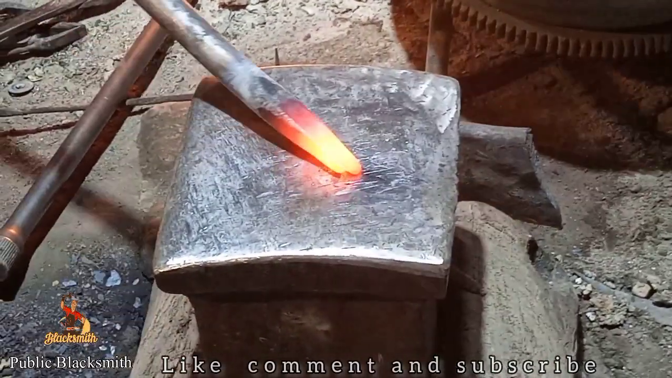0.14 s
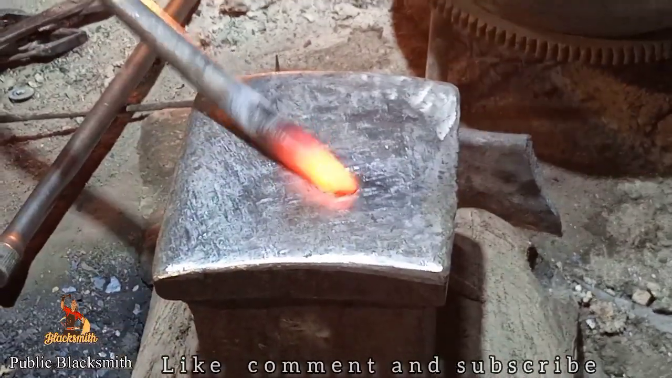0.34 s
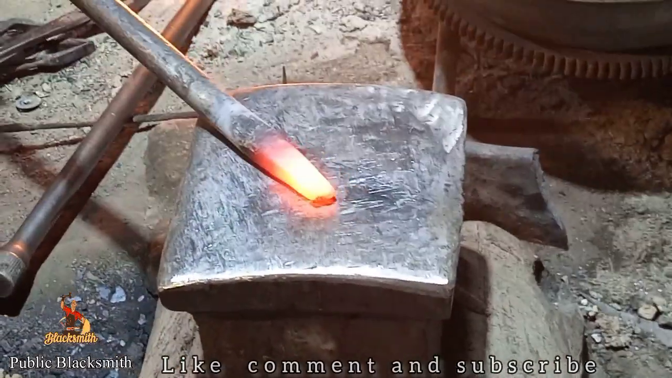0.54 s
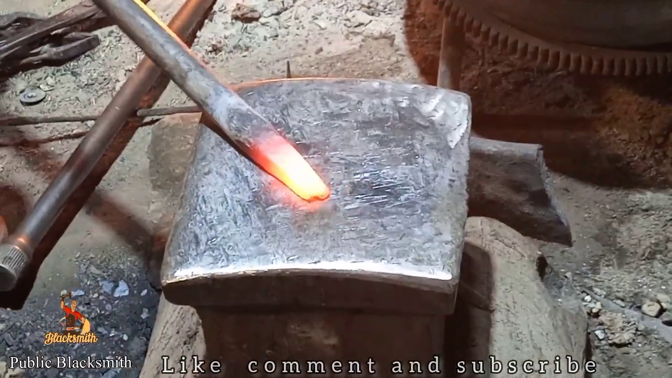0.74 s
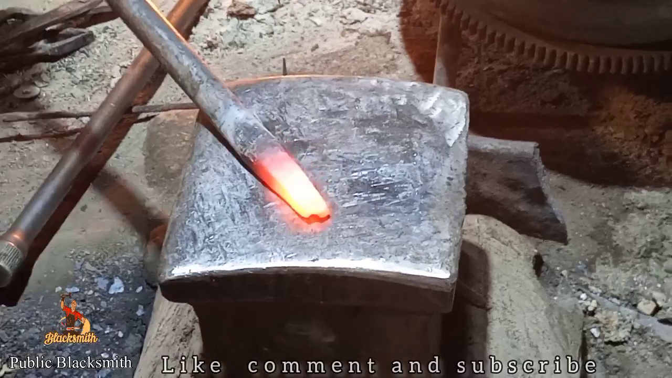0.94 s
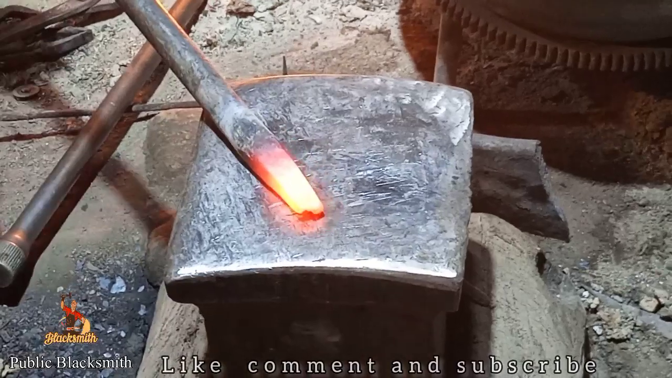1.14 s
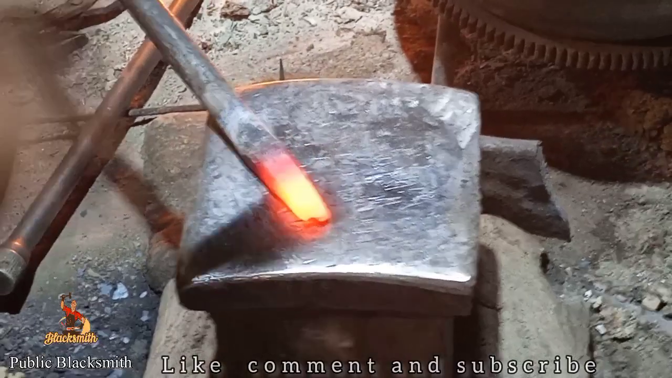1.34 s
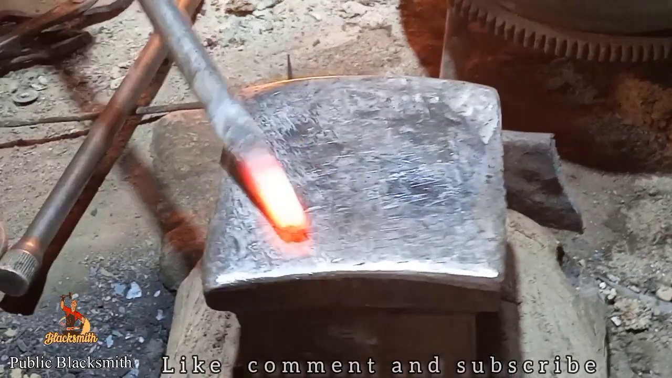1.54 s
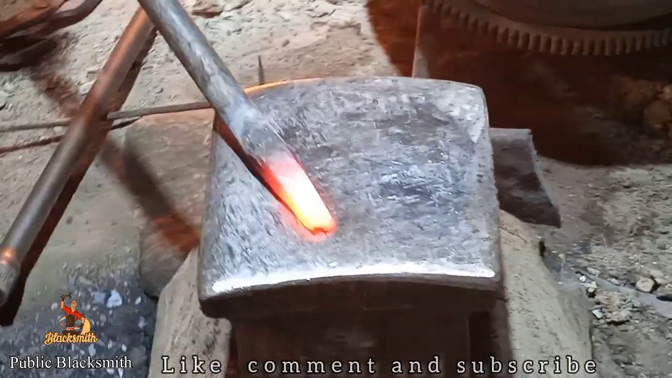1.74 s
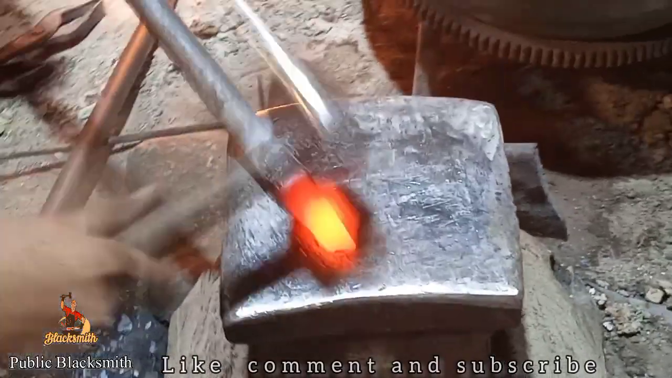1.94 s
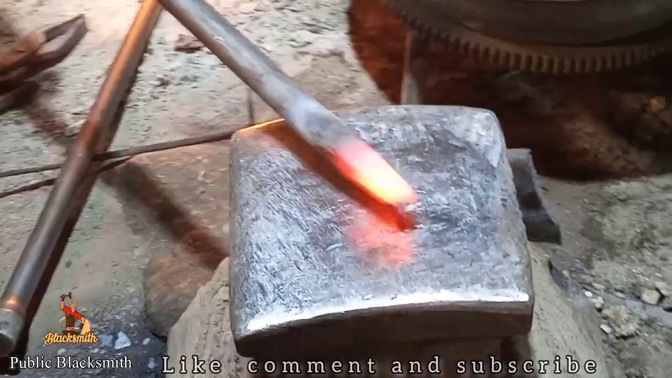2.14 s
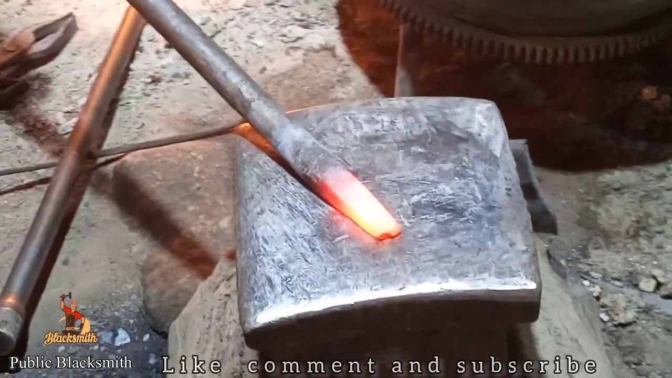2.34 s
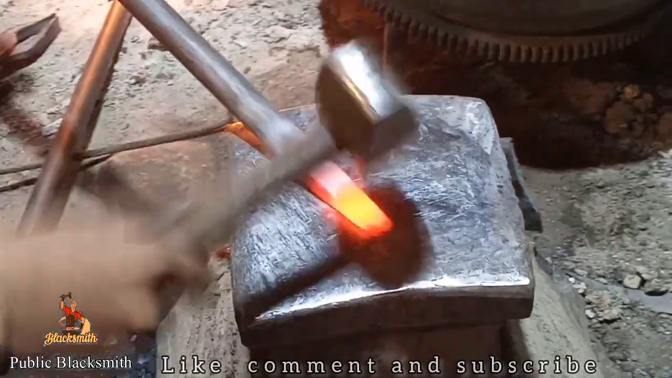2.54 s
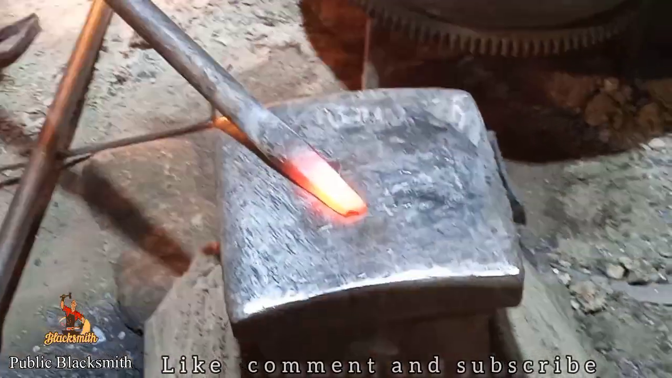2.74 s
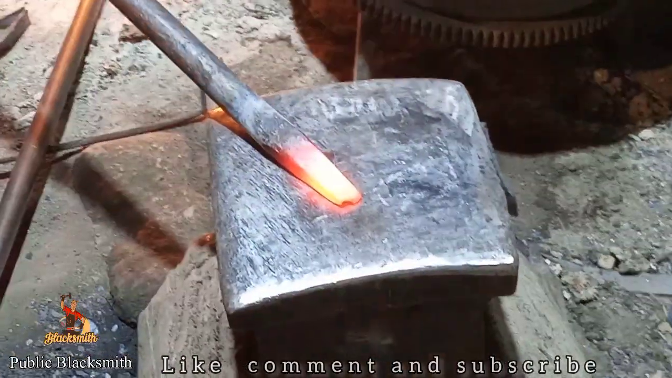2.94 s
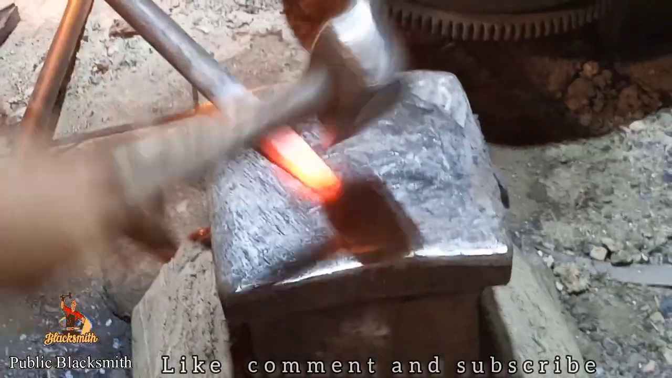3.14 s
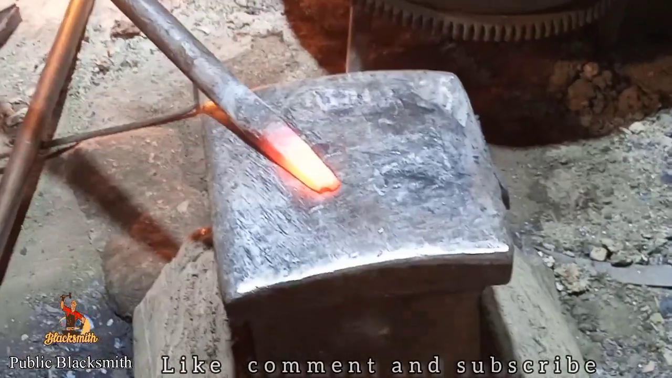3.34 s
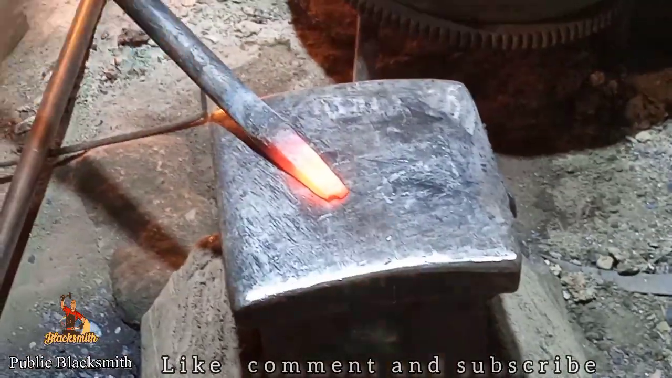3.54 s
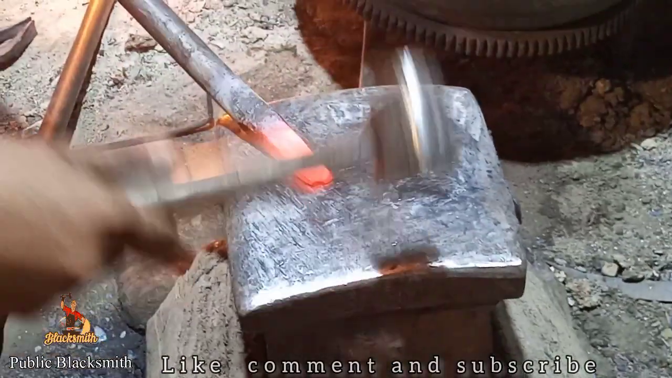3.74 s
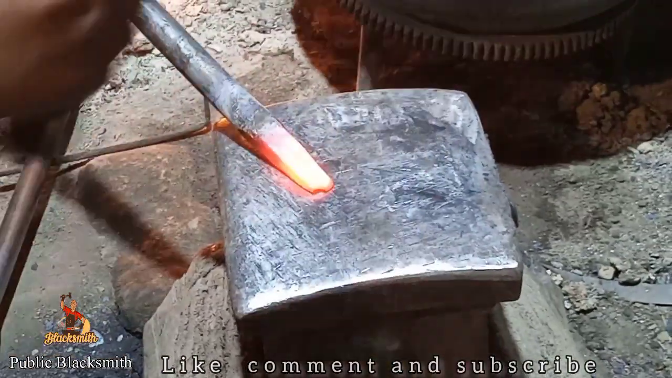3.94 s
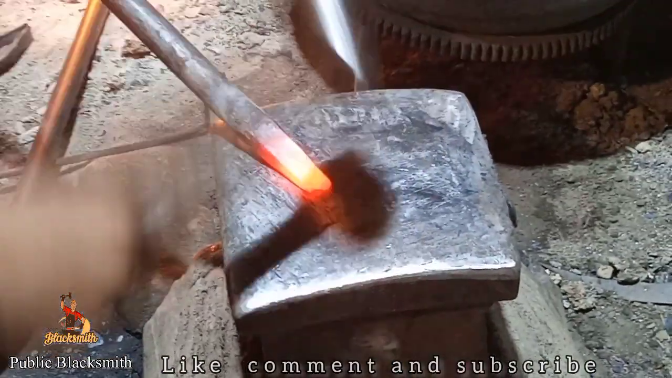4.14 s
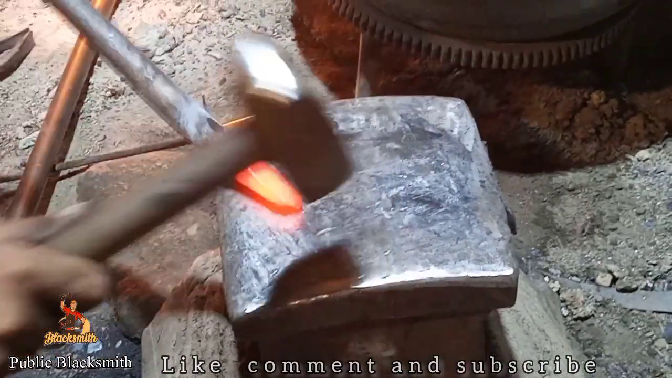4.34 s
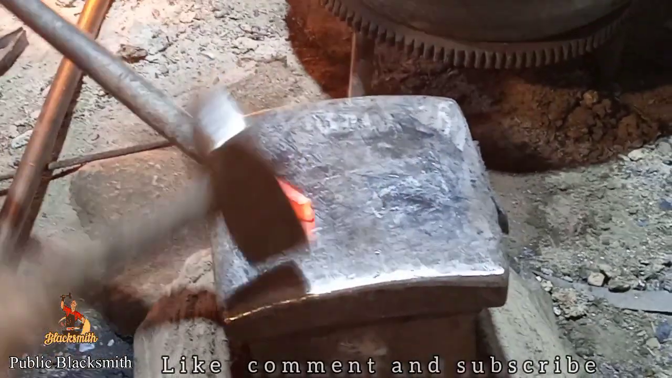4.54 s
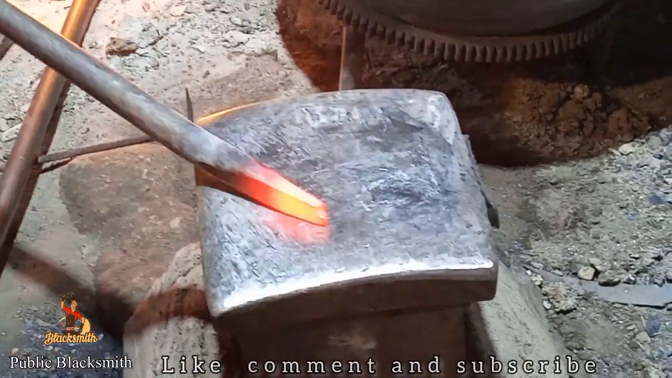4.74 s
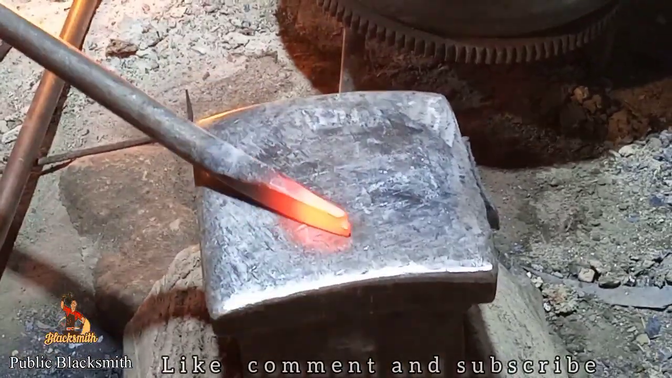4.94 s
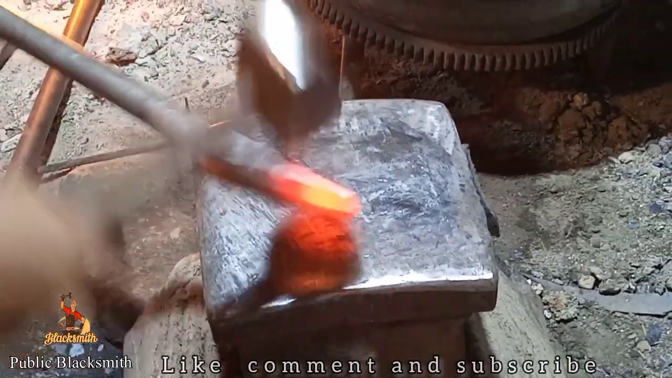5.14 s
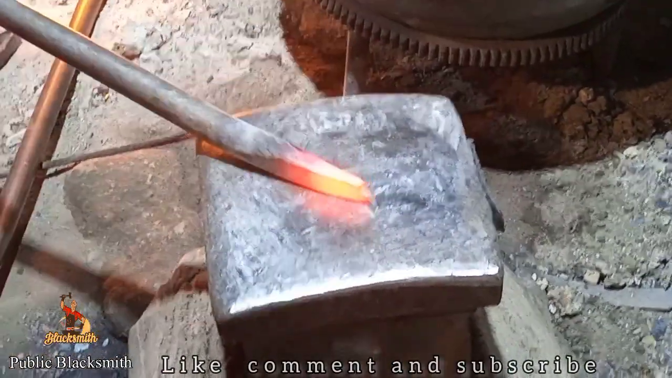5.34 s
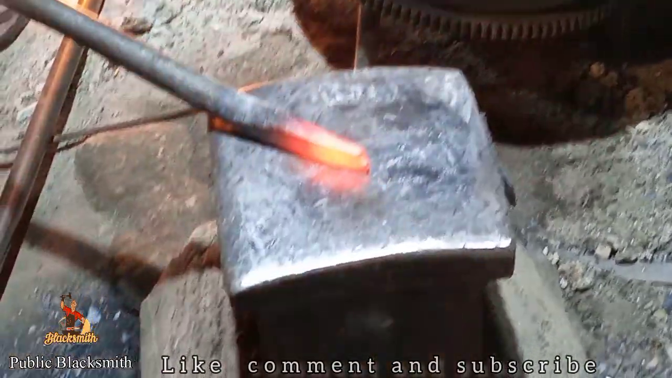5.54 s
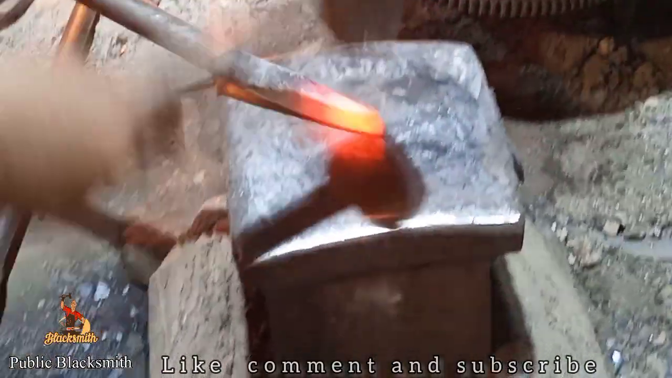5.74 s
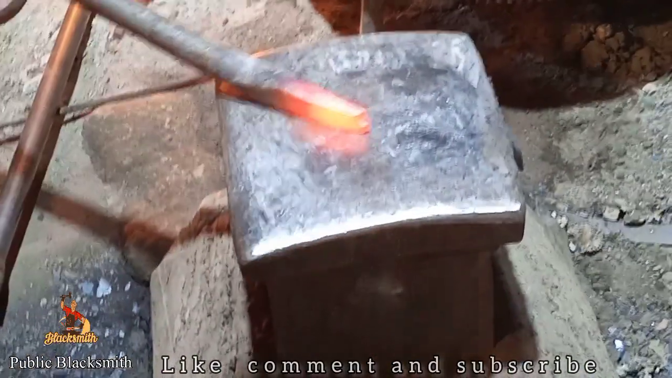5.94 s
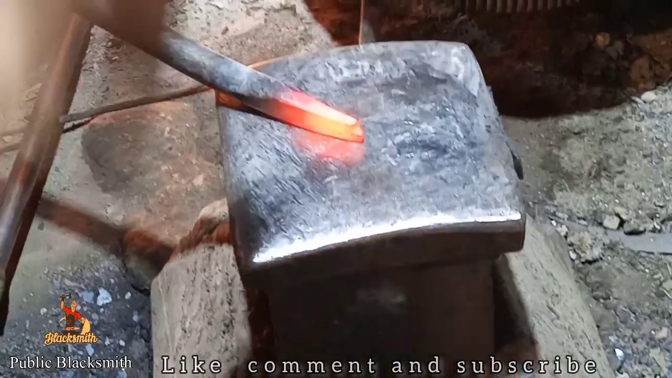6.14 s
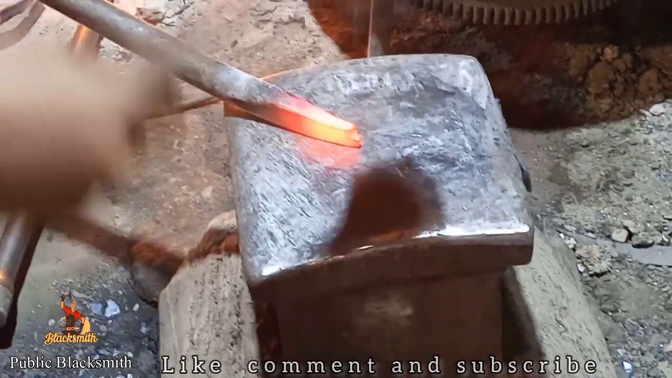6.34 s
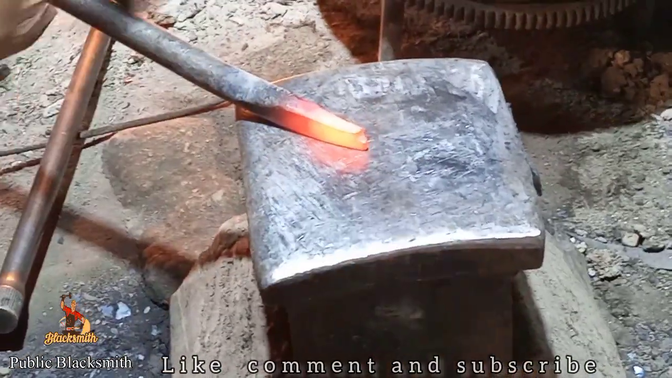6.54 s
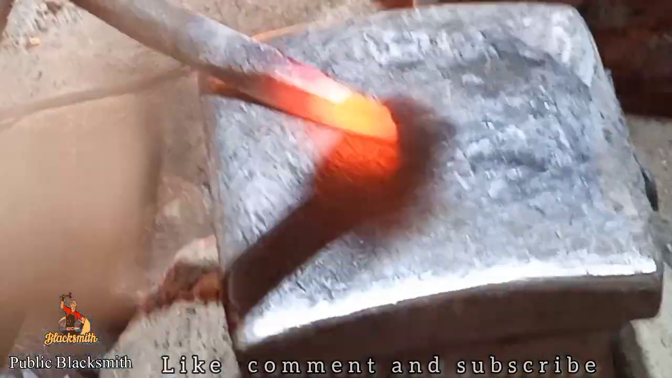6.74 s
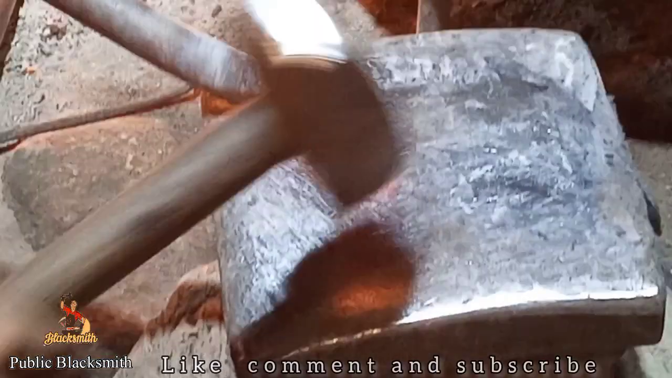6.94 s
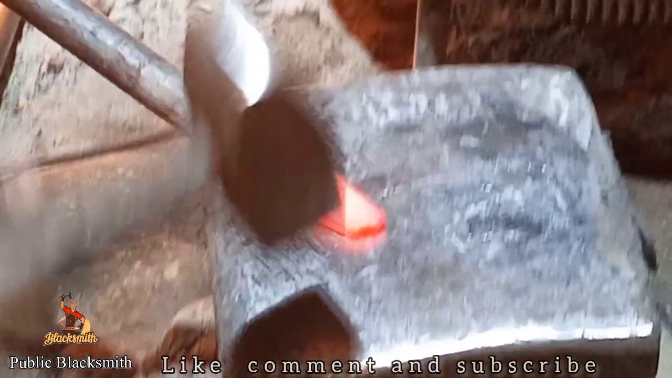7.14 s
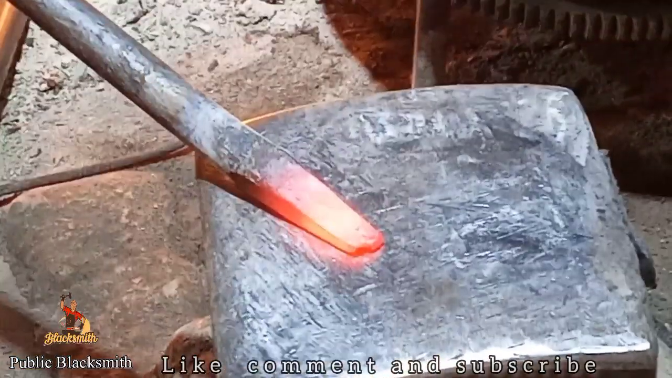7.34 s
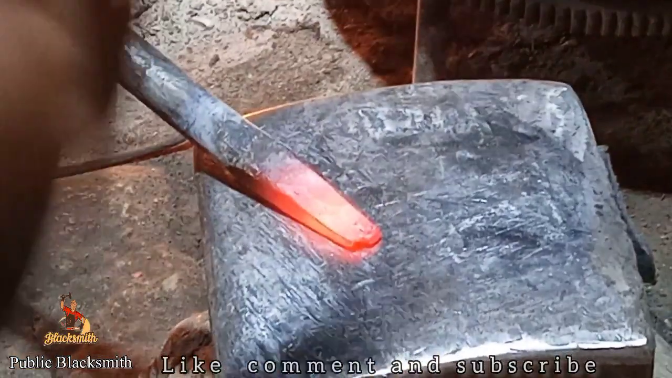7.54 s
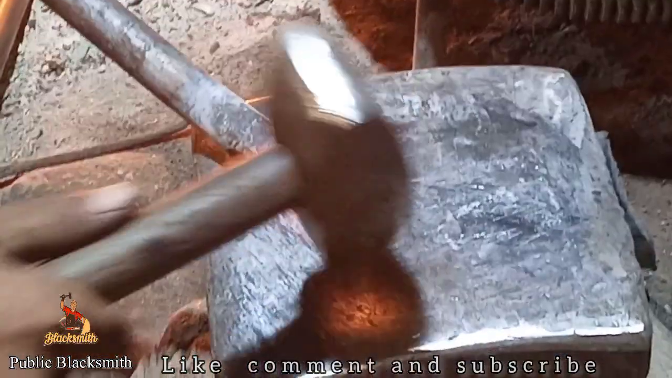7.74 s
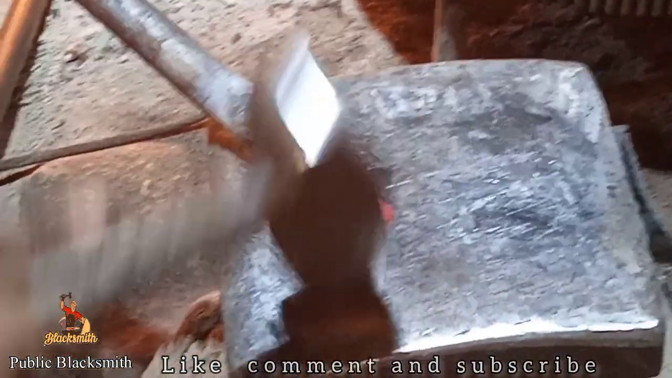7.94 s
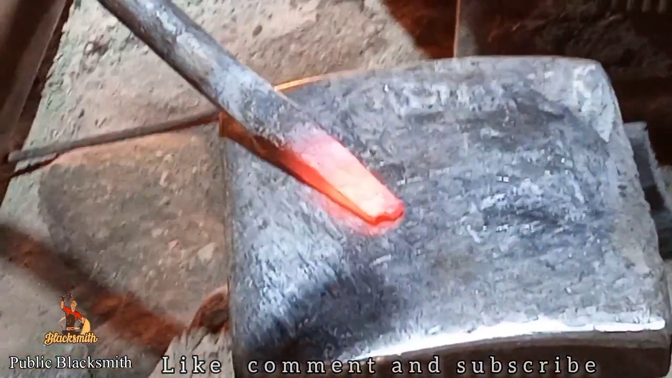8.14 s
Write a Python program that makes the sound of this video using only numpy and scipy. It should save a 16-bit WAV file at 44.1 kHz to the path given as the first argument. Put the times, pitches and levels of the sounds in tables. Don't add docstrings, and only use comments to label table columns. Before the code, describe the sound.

Blunt metallic hammer blows about twice a second, each with a short clattering ring and rough wash, in an open forge with rushing air.

```python
import sys
import numpy as np
from scipy import signal
from scipy.fft import rfft, irfft, next_fast_len
from scipy.io import wavfile
from scipy.ndimage import uniform_filter1d

SR = 44100
rng = np.random.default_rng(int(sys.argv[2]) if len(sys.argv) > 2 else 0)


def log_audio(samples):
    frames = np.atleast_2d(samples).T
    limited = np.clip(frames, -1, 1)
    pcm = np.round(limited * 32767).astype(np.int16)
    wavfile.write(sys.argv[1], SR, pcm)


def invert_db(x):
    u = np.asarray(x, float) / 20
    return 10 ** u


N = 361179

# start in seconds, crack in dB, force in dB, anvil ring in dB.
BLOWS = [(1.449, -8, -1.5, -39), (2.0225, 5, -5, -27), (2.596, 5.5, -7, -28), (3.164, 2.5, -5.5, -33),
         (3.7286, 1, -8.5, -26), (4.255, 6, -5, -36), (4.5908, -0.5, -18, -64), (5.1946, 7.5, -2.5, -22),
         (5.7529, 3.5, -5, -48), (6.3212, 0.5, -8.5, -33), (6.8785, 0.5, -4.5, -31),
         (7.1568, -0.5, -20, -62), (7.7231, -7, -10.5, -64), (8.0059, -2, -18.5, -69)]
# start in seconds, up-and-down bending in dB, sideways bending in dB,
# place along the bar (0 to about 0.5), tilt in dB per octave.
STRUCK = [(1.449, -4, -6, 0.26, 2), (2.0219, 3, -17, 0.26, 4.5), (2.5963, -14, -34, 0.25, 7),
          (3.16, -10, -20, 0.011, 0.5), (3.7287, -15.5, -24, 0.1, 5.5), (4.256, -7.5, -10.5, 0.0056, -1),
          (4.5901, -39, -43, 0.25, 1.5), (5.1956, -4, 4.5, 0.15, 0), (5.7527, -10, -8, 0.48, -7),
          (6.3218, -15, -13.5, 0.557, 2), (6.8776, -19, -8, 0.35, 1), (7.1572, -45, -32, 0.28, -2),
          (7.7236, -7.5, -19.5, 0.427, -2), (8.0059, -46.5, -35, 0.27, 15)]
# frequency in Hz, level in dB per Hz.
BLOWER = [(24, -62), (40, -23), (64, -16), (103, -6.5), (153, -9.5), (321, 0), (514, -9), (568, -7),
          (1110, -13.5), (1730, 1), (1960, -20.5), (2450, 2.5), (3070, -24), (3740, -14), (15000, -103)]


def rms_one(x):
    return x / np.sqrt(np.mean(x ** 2) + 1e-20)


def at_hz(points, hz):
    table_hz, values = np.transpose(points)
    return np.interp(np.log(hz), np.log(table_hz), values)


def clicks(times, levels_db):
    out = np.full(N, 1e-18)
    out[(np.asarray(times) * SR).astype(int)] = invert_db(levels_db)
    return out


def ring(x, hz, t60):
    r, w = invert_db(-60 / (t60 * SR)), 2 * np.pi * hz / SR
    return signal.lfilter([0, np.sin(w)], [1, -2 * r * np.cos(w), r * r], x)


def fade(x, t60):
    return signal.lfilter([1], [1, -invert_db(-60 / (t60 * SR))], x)


def bands():
    edges = 40 * 2 ** np.arange(0, 8.8, 1 / 3)
    white = rng.standard_normal((2, N))
    for k, (low, high) in enumerate(zip(edges, edges[1:])):
        band_filter = signal.butter(2, [low, high], "band", fs=SR, output="sos")
        yield np.sqrt(low * high), signal.sosfilt(band_filter, white[k % 2])


def drift(rate):
    knots = rng.standard_normal(400)
    return np.interp(np.arange(N) / SR * rate, np.arange(400), knots)


def background_air(hz, band, patchy_db=0.5):
    return band * invert_db(at_hz(BLOWER, hz) + patchy_db * drift(23)) / (1 + (hz / 8200) ** 6)


def blower(level_db=-57.5):
    # frequency in Hz, width in Hz, level in dB.
    duct_tones = [(568.4, 13.6, -69.5), (1722, 124, -59.5), (3673, 78, -74), (5910, 1100, -80.5),
                  (154, 9.2, -67.5), (75.5, 7, -73)]
    hiss = sum(background_air(hz, band) for hz, band in bands() if hz > 210)
    out = invert_db(level_db) * rms_one(hiss)
    for hz, width_hz, db in duct_tones:
        out += invert_db(db) * rms_one(ring(rng.standard_normal(N), hz, 3.0 / width_hz))
    return out


def rumble(lumps_db=7, shake_db=-37.5, shake_t60_s=0.36):
    # time in seconds, rumble in dB.
    gusts = [(0.0, -55.5), (0.84, -62.5), (1.71, -62), (2.76, -78.5), (3.78, -55), (3.94, -63),
             (5.57, -66.5), (6.52, -59), (6.89, -65), (8.19, -56)]
    times, _, force_db, _ = np.transpose(BLOWS)
    shake = fade(clicks(times, force_db + shake_db), shake_t60_s)
    gain = invert_db(np.interp(np.arange(N) / SR, *np.transpose(gusts))) + shake
    low = sum(background_air(hz, band) * invert_db(lumps_db * drift(6)) for hz, band in bands() if hz <= 210)
    return gain * rms_one(low)


def hammer(contact_s=0.0014, head_swell_s=0.024):
    # frequency in Hz, level in dB, t60 in seconds.
    crack = [(920, -6, 0.0055), (1925, 14, 0.001), (2410, -15, 0.0089), (6200, -31, .01),
             (10300, -49, 0.028), (15100, -47, 0.035)]
    thud = [(210, -17, 0.12), (620, -1, 0.018)]
    anvil = [(2444, -9, .2), (3205, 4, .3), (4490, -10, .18), (6368, -12, .22), (13155, -29, .35)]
    head = [(11236, 6, .55)]
    head_side = [(2260, -1, .12), (2550, 0, .1), (2720, 7, .16), (2990, 1.5, .1), (7600, -20, .15),
                 (9250, -17, .24), (10650, -29, .12)]
    # long ring in dB, side ring in dB.
    head_rings = [(-47, -31), (-64, -41), (-59, -34), (-57.5, -24), (-55, -49), (-83, -19), (-86, -37),
                  (-41, -23), (-52.5, -42), (-51, -50), (-73, -48), (-94, -25.5), (-54.5, -55),
                  (-83, -36.5)]
    # time in seconds, level in dB.
    head_before = (0.0, -68.5)
    times, *levels_db = np.transpose(BLOWS)
    levels_db += list(np.transpose(head_rings))
    rings = ring(clicks([head_before[0]], head_before[1]), head[0][0], head[0][2])
    for modes, level_db in zip((crack, thud, anvil, head, head_side), levels_db):
        swell_s = head_swell_s if modes is head else contact_s
        for hz, db, t60 in modes:
            strength = clicks(times, level_db + db + 2 * rng.standard_normal(len(times)))
            swell = np.exp(-1 / (swell_s * SR)) * np.exp(2j * np.pi * hz / SR)
            push = signal.lfilter([1 - abs(swell)], [1, -swell], strength).real * 2
            rings += ring(push, hz, t60)
    return rings


def knocks():
    # start in seconds, level in dB, frequency in Hz, t60 in seconds.
    bumps = [(0.386, -45, 127, 0.1), (0.742, -43, 322, 0.12), (0.967, -49.5, 1680, 0.28),
             (1.229, -48, 1750, 0.18), (1.41, -48, 1773, 0.1), (2.953, -39.5, 1730, 0.028),
             (3.019, -47, 135, 0.22), (3.071, -51, 127, 0.12), (3.486, -46.5, 143, 0.3),
             (3.537, -45, 130, 0.24), (3.938, -44, 159, 0.17), (4.799, -44.5, 328, 0.14)]
    return sum(ring(clicks([s], db), hz, t60) for s, db, hz, t60 in bumps)


def slip():
    # frequency in Hz, level in dB, middle in seconds, half width in seconds.
    slide_tones = [(1415, -55, 0.517, 0.023), (2086, -38.5, .51, 0.012), (2795, -30, 0.532, 0.014),
                   (2860, -46, .535, 0.014), (3610, -42.5, 0.528, 0.0095)]
    t = np.arange(SR) / SR
    out = np.zeros(SR)
    for hz, db, middle_s, half_s in slide_tones:
        after = t > middle_s
        distance = np.abs((t - middle_s) / half_s / np.where(after, 1.3, 1))
        swell = np.exp(-distance ** np.where(after, 0.85, 1.3))
        out += invert_db(db) * swell * np.sin(2 * np.pi * hz * t)
    return np.pad(out, (0, N - SR))


def contacts():
    # start in seconds, up-and-down bending in dB,
    # sideways bending in dB, place along the bar, tilt in dB per octave.
    rebounds = [(1.588, -24, -33, 0.24, 0), (1.67, -26.5, -49, 0.25, -6), (1.756, -38.5, -47, 0.23, 9.5),
                (1.82, -41, -43, 0.12, 1), (2.175, -17.5, -38, 0.11, 11), (2.189, -24, -36, 0.12, -4),
                (2.298, -24, -32, 0.11, 3.5), (2.365, -31.5, -34, 0.13, -2.5),
                (2.426, -32, -43.5, 0.36, -4.5), (4.382, -16.5, -23, 0.39, 4),
                (4.43, -26, -26.5, 0.57, 0.5), (4.488, -28, -24, 0.24, 3.5), (4.558, -35, -31, 0.54, 1.5),
                (5.885, -41, -27, 0.43, 4), (7.0, -31, -30.5, 0.382, 2.5), (7.225, -33.5, -41, 0.24, 3.5)]
    return sorted(STRUCK + rebounds)


def clatter_db():
    levels = []
    for row in contacts():
        bending_db = max(row[1:3])
        levels.append(bending_db - 12 if row in STRUCK else 1.236 * bending_db - 4)
    return np.array(levels)


def place_db(modes, first_order, place):
    orders = first_order + np.arange(len(modes))
    return 20 * np.log10(np.abs(np.cos(np.pi * orders * place - np.pi / 4)) + 0.1)


def brightness_octaves(hz):
    return np.log2(np.minimum(hz, 7000) / 2500)


def bar(t60=0.2, dulling=0.12, chatter_db=5.0, wander=0.99, chatter_rate=60):
    # frequency in Hz, level in dB.
    bend = [(877, -15), (1425, -8), (2068, -3), (2812, -4), (3600, -8), (4485, -17), (5485, -20),
            (6590, -25), (7790, -34), (9055, -35), (10350, -40)]
    across = [(1436, -8), (2124, -2), (2894, -1), (3762, -11), (4764, -12), (5820, -20), (6900, -32),
              (8183, -41), (9475, -46)]
    lengthwise = [(1936, 0), (3917, -8), (5873, -10)]
    # frequency in Hz, level in dB, t60 in seconds.
    tap = [(1397, 0, 0.091), (1940, -18, 0.042)]
    # time in seconds, ring time factor, lowest mode in dB.
    grip = [(1.45, 1.05, 15.5), (1.82, 0.73, -15), (2.02, 1.06, 6.5), (2.3, 1.2, 0), (2.43, 0.67, -16),
            (3.16, 1.26, -7), (3.73, 1.26, -8), (4.26, 1.65, -4.5), (4.59, 0.6, 6.5), (5.2, 1.22, -11),
            (5.75, 0.96, 1), (6.32, 0.86, -12), (6.88, 1.63, -4), (7.16, 0.61, -14), (7.23, 2.2, -16),
            (7.72, 0.92, -13), (8.0, 0.53, -16)]
    damp_s, survives = 0.012, 0.18
    touches = contacts()
    out = np.zeros(N)
    for hz, db, t60_s in tap:
        out += ring(clicks(np.array(touches)[:, 0], clatter_db() + db), hz, t60_s)
    ends = [row[0] for row in touches[1:]] + [N / SR]
    hz, modes_db = np.transpose(bend + across + lengthwise)[:, :, None]
    bend_octaves = brightness_octaves(np.array(bend)[:, 0])
    across_octaves = brightness_octaves(np.array(across)[:, 0])
    grip_s, factors, lowest = np.transpose(grip)
    for (start, db, side_db, place, tilt_db), end in zip(touches, ends):
        factor = np.interp(start, grip_s, factors)
        at = int(start * SR)
        t = np.arange(0, min(int(0.45 * SR), N - at - 8), 8) / SR
        hammered = np.min(np.abs(np.array(BLOWS)[:, 0] - start)) < 0.006
        rise_s = 0.0057 if hammered else 0.004

        upright_db = db + place_db(bend, 3.5, place) + tilt_db * bend_octaves
        upright_db[0] += np.interp(start, grip_s, lowest)
        across_db = side_db + place_db(across, 4.5, place) + (tilt_db - 1) * across_octaves
        along_db = np.full(len(lengthwise), max(db, side_db) + (-11 if hammered else -9))
        struck_db = np.concatenate([upright_db, across_db, along_db])[:, None]
        decay_db = -60 * t / (t60 * factor * (3000 / hz) ** dulling)

        knots = rng.standard_normal((2 * len(hz), 80))
        flutter = np.array([np.interp(t * chatter_rate, np.arange(80), row) for row in knots])
        flutter_db = chatter_db * np.clip(hz / 2200, 0, 1) * flutter[::2]
        phase = rng.uniform(0, 2 * np.pi, hz.shape) + wander * flutter[1::2]

        since_next = np.maximum(t - end + start, 0)
        deadened = np.exp(-since_next / (damp_s * (3000 / hz) ** 2))
        shape = (1 - np.exp(-t / rise_s)) * (survives + (1 - survives) * deadened)
        gain = shape * invert_db(modes_db + struck_db + decay_db + flutter_db)
        gain, phase = np.repeat([gain, phase], 8, axis=2)
        fine = np.arange(gain.shape[1])
        out[at + fine] += np.sum(gain * np.sin(2 * np.pi * hz * fine / SR + phase), axis=0)
    return out


def loose_iron(x, ripple_hz=110, rib_db=7):
    size = next_fast_len(N)
    hz = np.arange(size // 2 + 1) * SR / size
    ribs = np.interp(hz / ripple_hz, np.arange(400), rng.standard_normal(400))
    colour = invert_db(rib_db * ribs * np.clip(hz / 5000, 0, 1)) / (1 + (hz / 15800) ** 40)
    folded = irfft(np.log(colour), size) * np.where(np.arange(size) < size / 2, 2, 0)
    folded[0] /= 2
    return irfft(rfft(x, size) * np.exp(rfft(folded)), size)[:N]


def wash(blow_db=-6, rise_s=0.0038, dulling=1.0, thinning=0.3, grain_db=2.5,
         clatter_hz=1300, clatter_life=0.72, clatter_dulling=0.53):
    # frequency in Hz, level in dB per Hz.
    wash_colour = [(59, -26), (100, 0.5), (210, 7), (471, 5.5), (930, 3), (1170, -2.5), (1580, 9.5),
                   (3250, 3), (4980, -5.5), (6420, 1), (8280, -6.5), (13500, -15), (16000, -26)]
    # frequency in Hz, t60 in seconds.
    wash_t60 = [(150, 0.18), (500, 0.23), (2000, 0.22), (5000, 0.29), (8000, 0.12), (15000, 0.16)]
    times, _, force_db, _ = np.transpose(BLOWS)
    touch_times = np.array(contacts())[:, 0]
    out, power, fill = np.zeros(N), 0, np.exp(-1 / (rise_s * SR))
    for hz, band in bands():
        band = band * invert_db(at_hz(wash_colour, hz))
        power += np.mean(band ** 2)
        t60 = at_hz(wash_t60, hz)
        loss = dulling * max(np.log2(hz / 3000), 0) ** 0.87 + thinning * max(np.log2(600 / hz), 0)
        dying = fade(clicks(times, force_db * (1 + loss) + blow_db), t60)
        touch_db = clatter_db() * (1 + clatter_dulling * max(np.log2(hz / 6000), 0))
        rattle = fade(clicks(touch_times, touch_db), clatter_life * t60)
        dying += rattle * np.clip(hz / clatter_hz, 0, 1) ** 3
        swelling = signal.lfilter([1 - fill], [1, -fill], dying)
        out += band * invert_db(grain_db * drift(45)) * swelling
    return loose_iron(out) / np.sqrt(power)


def shed(x, t60=0.19, wet_db=-8):
    t = np.arange(int(0.25 * SR)) / SR
    echoes = rng.standard_normal(len(t)) * invert_db(-60 * t / t60) * (t > 0.004)
    echoes = echoes / np.sqrt(np.sum(echoes ** 2))
    return x + invert_db(wet_db) * signal.fftconvolve(x, echoes)[:N]


def scene():
    rings = shed(hammer() + slip() + bar())
    return (blower() + rumble() + rings + knocks() + wash())[None]


def low_pass(x):
    return signal.sosfilt(signal.butter(12, 16830, fs=SR, output="sos"), x)


def record(dry):
    threshold_db, squeeze, release_db_per_s = -33.5, 0.71, 625
    sense_s, smooth_s, ahead_s = 0.0045, 0.021, 0.0007
    dry = signal.sosfilt(signal.butter(2, 62, "high", fs=SR, output="sos"), dry)
    level_db = 10 * np.log10(uniform_filter1d(dry[0] ** 2, int(sense_s * SR)) + 1e-12)
    fall = release_db_per_s * np.arange(N) / SR
    held_db = np.maximum.accumulate(level_db + fall) - fall
    cut_db = squeeze * np.maximum(held_db - threshold_db, 0)
    cut_db = uniform_filter1d(cut_db, int(smooth_s * SR))
    cut_db = np.interp(np.arange(N) + ahead_s * SR, np.arange(N), cut_db)
    return low_pass(dry * invert_db(-cut_db))


dry = scene()
out = record(dry)
log_audio(out)
```